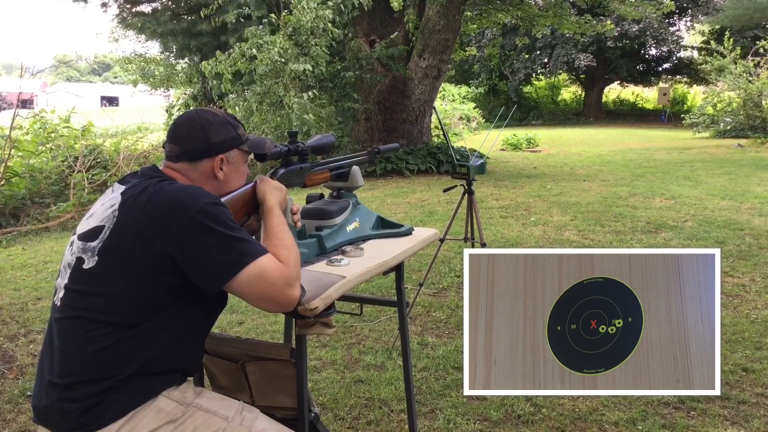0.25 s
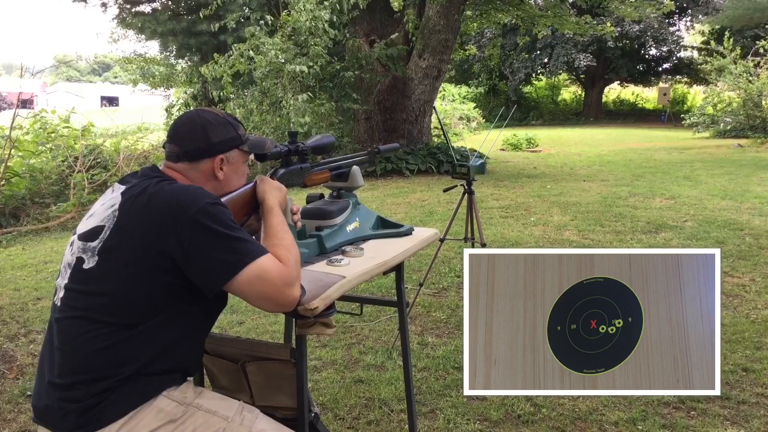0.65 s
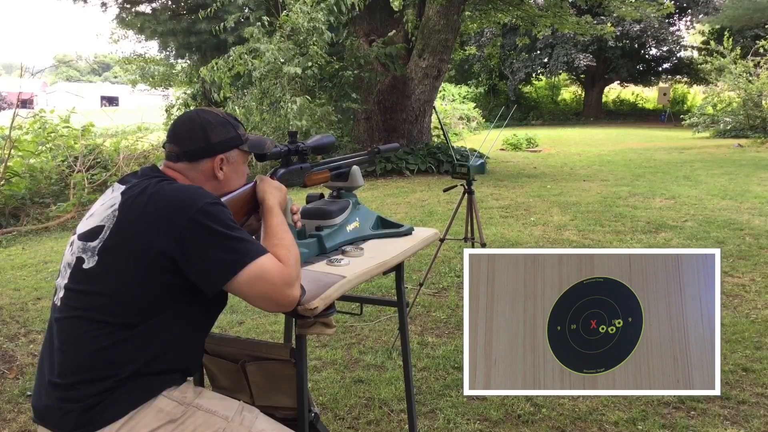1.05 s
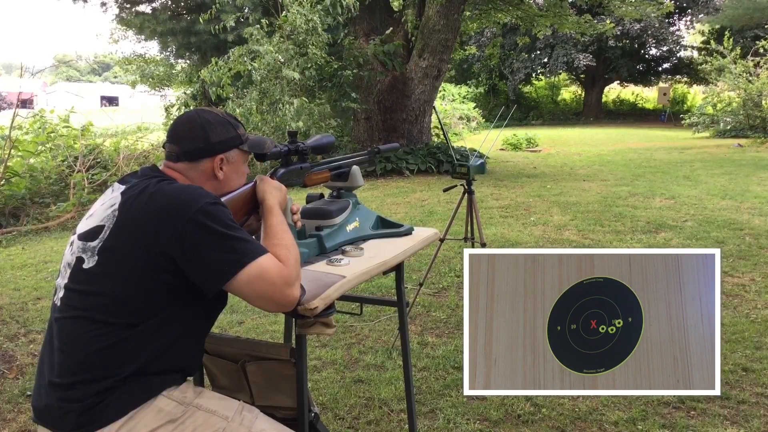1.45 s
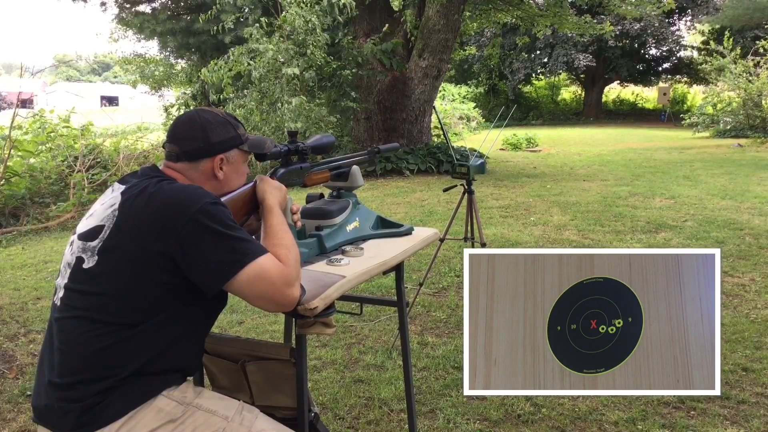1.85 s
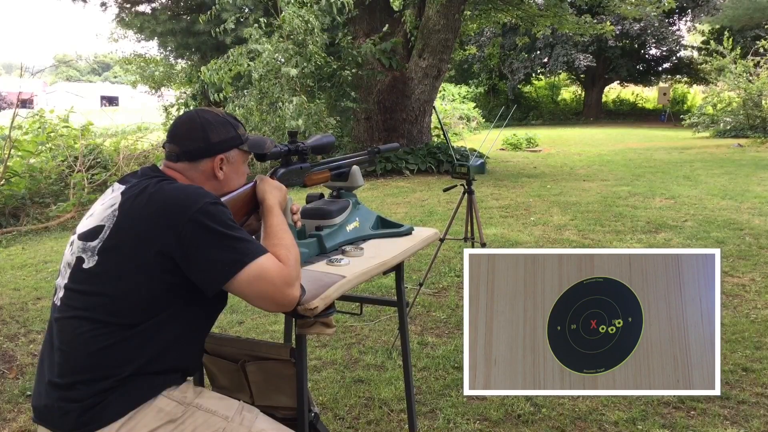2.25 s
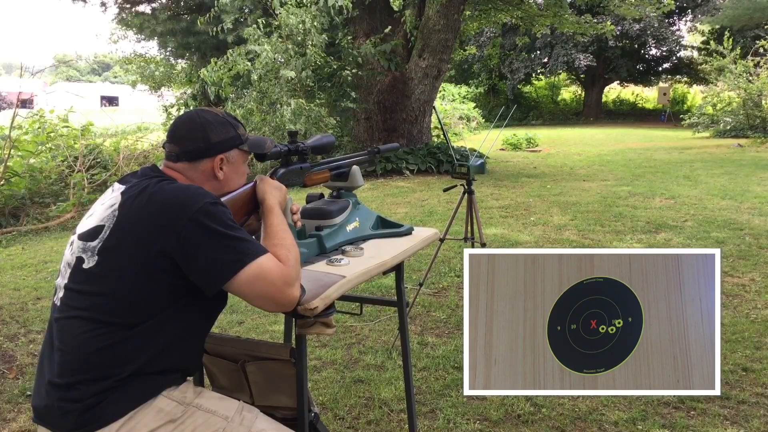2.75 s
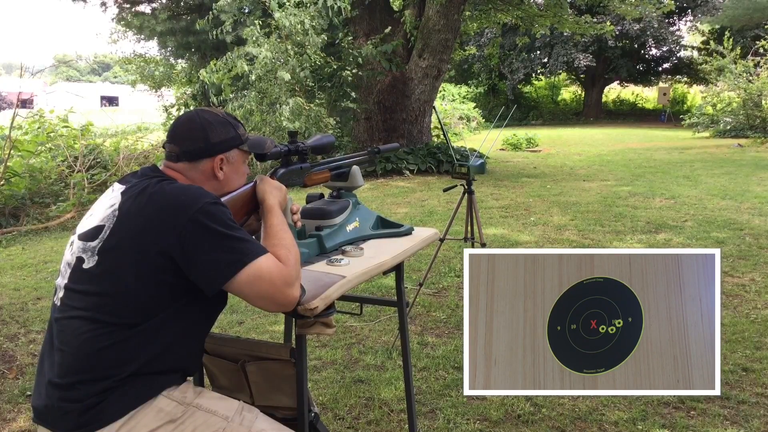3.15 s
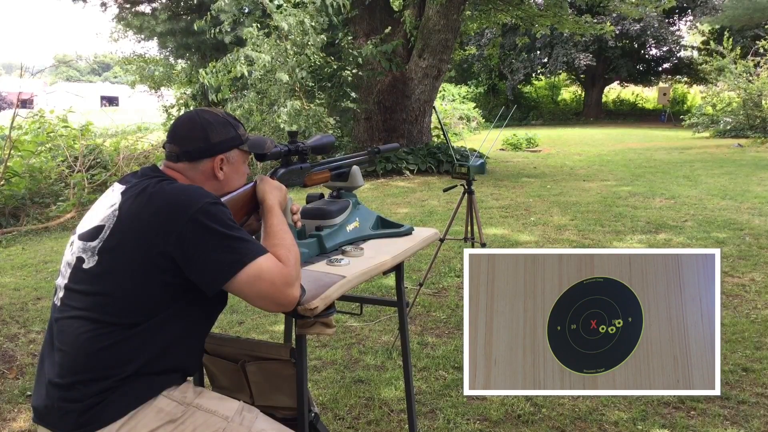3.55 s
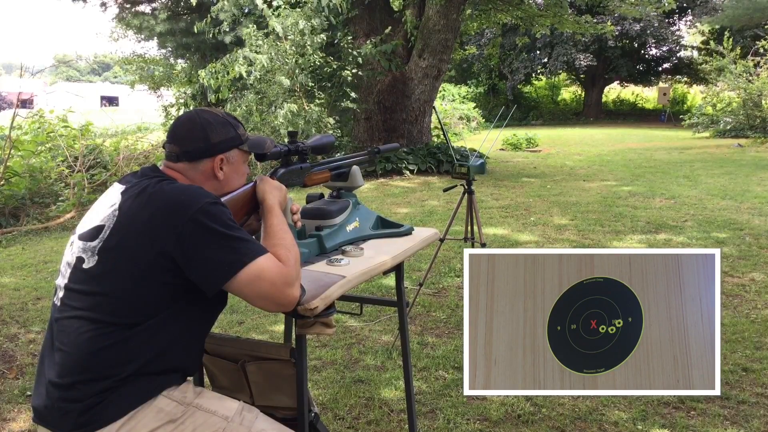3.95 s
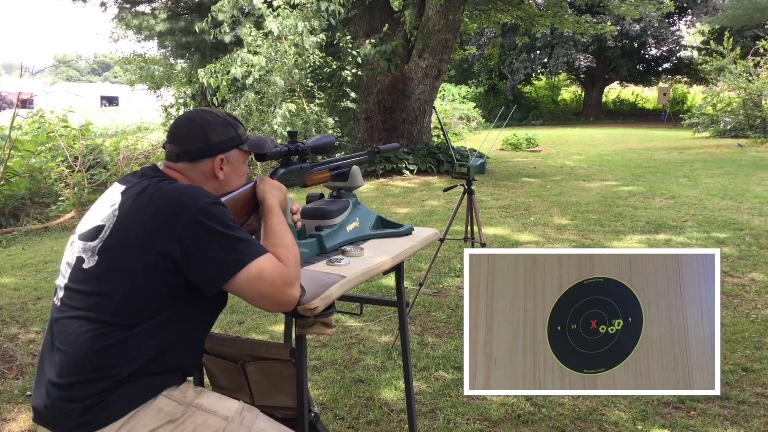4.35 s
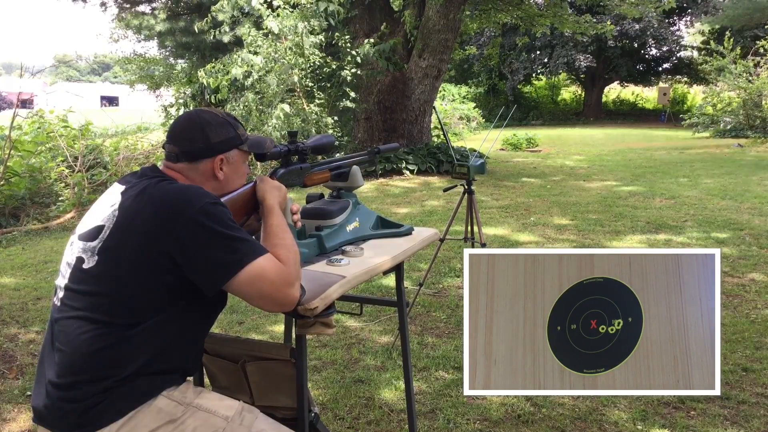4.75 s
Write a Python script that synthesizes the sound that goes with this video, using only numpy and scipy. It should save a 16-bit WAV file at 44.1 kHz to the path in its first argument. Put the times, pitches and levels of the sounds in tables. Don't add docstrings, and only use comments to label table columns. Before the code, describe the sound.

After four and a half quiet seconds of breeze and distant songbirds, an air rifle snaps loudly, its pellet hits a board, and echoes scatter.

```python
import sys
import numpy as np
from scipy import signal
from scipy.fft import rfft, irfft, next_fast_len
from scipy.io import wavfile
from scipy.ndimage import uniform_filter1d

SR = 44100
rng = np.random.default_rng(int(sys.argv[2]) if len(sys.argv) > 2 else 0)


def transcribe(u):
    v = np.clip(np.atleast_2d(u).T, -1, 1)
    q = np.round(v * 32767).astype(np.int16)
    wavfile.write(sys.argv[1], SR, q)


def to_linear_factor(level_db):
    exponent = np.asarray(level_db, float) / 20
    return 10 ** exponent


N = 221247
TIME = np.arange(N) / SR


def on_log(points, hz):
    table_hz, value = np.transpose(points)
    return np.interp(np.log(np.maximum(hz, 1)), np.log(table_hz), value)


def curve(rows, column=1, outside=-120):
    rows = np.array(rows)
    return np.interp(TIME, rows[:, 0], rows[:, column], left=outside)


def noise(points):
    size = next_fast_len(N)
    hz = np.arange(size // 2 + 1) * SR / size
    spectrum = rfft(rng.standard_normal(size)) * to_linear_factor(on_log(points, hz))
    x = irfft(spectrum, size)[:N]
    return x / x.std()


def walk(rate):
    hold = int(SR / rate)
    steps = np.repeat(rng.standard_normal(N // hold + 1), hold)
    x = uniform_filter1d(uniform_filter1d(steps, hold), hold)[:N]
    return x / x.std()


def bands(points, gain_db, flicker_db, rate, calm_hz):
    size = next_fast_len(N)
    hz = np.maximum(np.arange(size // 2 + 1) * SR / size, 1)
    colour = to_linear_factor(on_log(points, hz))
    colour = colour / np.sqrt(np.mean(colour ** 2))
    out = 0
    for centre in 24 * 2 ** (np.arange(20) / 2):
        window = np.cos(np.pi * np.clip(np.log2(hz / centre), -1 / 2, 1 / 2))
        band = irfft(rfft(rng.standard_normal(size)) * colour * window, size)[:N]
        flicker = flicker_db * walk(rate) / (1 + (centre / calm_hz) ** 2)
        out = out + band * to_linear_factor(gain_db(centre) + flicker)
    return out


def ring(start, hz, t60):
    out, i = np.zeros(N), int(start * SR) + 1
    t = TIME[i:] - start
    out[i:] = np.sin(2 * np.pi * hz * t) * to_linear_factor(-60 * t / t60)
    return out


def burst(start, db, t60):
    return to_linear_factor(db - 60 * np.maximum(TIME - start, 0) / t60) * (TIME > start)


# (time [s], level [dB])
JET = [(4.492, -52.5), (4.5095, -28.5), (4.5108, -18), (4.5148, -16.5), (4.5158, -6.5), (4.530, -10),
       (4.534, -17.5), (4.60, -35), (4.68, -97)]
# (frequency [Hz], density [dB per Hz])
JET_COLOUR = [(150, 0.5), (400, -10), (1100, -8), (1900, -9), (3000, -4), (5000, -9.5), (8000, -12),
              (16000, -18)]
VALVE_S = 4.5153
LEAK_TREBLE_DB, BLAST_TREBLE_DB, SETTLED_TREBLE_DB, SETTLE_S = -18, 0, -9.5, .010


def air_jet():
    grain = to_linear_factor(2.1 * walk(1500))
    treble = noise([(5000, -68), (8500, 1), (10500, -5), (12500, 6.5), (14500, -4), (16000, -12.5)])
    fresh = np.exp(-(np.maximum(TIME - VALVE_S, 0) / SETTLE_S) ** 2)
    open_db = SETTLED_TREBLE_DB + (BLAST_TREBLE_DB - SETTLED_TREBLE_DB) * fresh
    share_db = np.where(TIME < VALVE_S, LEAK_TREBLE_DB, open_db)
    return to_linear_factor(curve(JET)) * grain * (noise(JET_COLOUR) + to_linear_factor(share_db) * treble)


# (time [s], frequency [Hz], level [dB])
WHISTLE = [(4.5155, 12600, -24), (4.5178, 11400, -10), (4.5212, 12400, -10), (4.5235, 14200, -13),
           (4.525, 15000, -40)]


def whistle():
    hz = curve(WHISTLE, outside=0) + 250 * walk(3000)
    phase = 2 * np.pi * np.cumsum(hz) / SR
    return to_linear_factor(curve(WHISTLE, column=2)) * np.sin(phase) * (TIME < WHISTLE[-1][0])


# (time [s], level [dB])
BLOWS = [(4.513, -23), (4.5167, -7.5), (4.5195, -16.5), (4.5231, -16.5), (4.527, -8), (4.531, -12)]
# (frequency [Hz], level [dB], t60 [s])
STOCK = [(208, -7, 0.057), (325, -16.5, 0.045), (400, -1.5, 0.04), (521, -1.5, 0.049), (630, -7.5, 0.022),
         (732, -15, .035), (1100, -10, 0.041), (1800, -8.5, .02)]


def stock():
    out = 0
    scatter = 1 + 0.49 * rng.standard_normal((len(BLOWS), len(STOCK)))
    for (s, db), shares in zip(BLOWS, scatter):
        for (hz, mode_db, t60), share in zip(STOCK, shares):
            out = out + to_linear_factor(db + mode_db - 1.5) * share * ring(s, hz, t60)
    return out


# (time [s], level [dB], fade [ms], slowness [ms])
THUDS = [(4.5115, -21, 5, .8), (4.517, -24, 8, .9), (4.530, -8, 14, 1.0), (4.572, 0, 17, 1.0)]


def thuds():
    out = 0
    for s, db, fade_ms, slow_ms in THUDS:
        ms = np.maximum(TIME - s, 0) * 1000
        swell = (1 - np.exp(-ms / 1.5)) * np.exp(-(ms / fade_ms) ** 1.66)
        out = out + to_linear_factor(db) * swell * np.cos(np.pi * np.sqrt(ms / slow_ms))
    return signal.sosfiltfilt(signal.butter(2, 33, "high", fs=SR, output="sos"), out)


# (time [s], level [dB], frequency [Hz], t60 [s])
RINGS = [(4.5108, -13, 3500, .02), (4.5161, -5, 1850, .02), (4.5162, -17, 4400, 0.01),
         (4.5204, -7, 1520, 0.012), (4.5250, -7.5, 1120, .04), (4.5254, -13, 3320, 0.013),
         (4.5262, -11, 1800, 0.0086), (4.5305, -14, 190, .03), (4.5327, -11, 181.6, 0.082),
         (4.5461, -15, 3600, .012), (4.5682, -13, 3600, 0.016), (4.57, -14, 3300, .0074),
         (4.5713, 0.5, 1250, 0.019), (4.572, -7, 1750, 0.021), (4.5712, -12, 4400, .01),
         (4.5749, -12.5, 2464, 0.028), (4.576, -14.5, 3700, 0.031), (4.586, -16, 3850, .02),
         (4.6045, -13.5, 1600, 0.019), (4.6097, -17.5, 3330, 0.047), (4.6218, -22, 1980, .03),
         (4.6593, -11, 1750, 0.011), (4.659, -18, 2700, .012), (4.6886, -20, 2870, .014),
         (4.6902, -21, 2600, 0.016), (4.710, -20, 2400, 0.009), (4.7158, -18, 1550, 0.012),
         (4.7194, -10, 1400, 0.013), (4.7232, -16.5, 1690, 0.014), (4.727, -17, 2300, .014),
         (4.7345, -16.5, 1800, .014), (4.741, -19, 2900, .012), (4.7555, -21, 1800, .014),
         (4.7667, -25, 1490, 0.014), (4.7737, -33, 2970, .012), (4.7934, -27, 3000, 0.011),
         (4.836, -31, 3200, 0.011), (4.93, -43.5, 790, 0.098), (4.946, -29, 2900, .012)]
# (time [s], level [dB], t60 [s])
BURSTS = [(4.565, -21, 0.08), (4.5674, -20, 0.046), (4.5706, -6.5, 0.035), (4.577, -29, 0.069),
          (4.6064, -21, 0.11), (4.6593, -25.5, 0.021), (4.713, -32, 0.04), (4.721, -25.5, 0.03)]
# (frequency [Hz], density [dB per Hz])
SPLINTER = [(300, -10.5), (900, -9), (1500, 0.5), (3500, -5.5), (6000, -12.5), (12000, -15.5), (16000, -21)]


def strikes():
    splinter = noise(SPLINTER) * to_linear_factor(0.66 * walk(830))
    bursts = sum(burst(s, db, t60) for s, db, t60 in BURSTS)
    rings = sum(to_linear_factor(db) * ring(s, hz, t60) for s, db, hz, t60 in RINGS)
    return rings + bursts * splinter


# (time [s], level [dB])
TICKS = [
    (1.605, -68),
    (1.885, -74),
    (3.808, -70),
    (4.5107, -22),
    (4.5713, -9),
    (4.7217, -25),
]


def ticks():
    bright = noise([(3000, -27), (7000, -3), (12000, 4), (16000, -1)])
    return sum(burst(s, db, .006) * bright for s, db in TICKS)


# (time [s], level [dB])
TREES = [(4.53, -39), (4.56, -34), (4.60, -22), (4.64, -26.5), (4.695, -27), (4.722, -24.5), (4.76, -27.5),
         (4.85, -32), (5.02, -41)]
# (frequency [Hz], density [dB per Hz])
TREES_COLOUR = [(60, -10.5), (150, -14.5), (400, -19), (880, -13.5), (1080, -3.5), (1500, -2.5), (2300, 0),
                (3300, -5.5), (4300, -10), (8500, -17.5), (12000, -26), (15500, -41.5)]
# (frequency [Hz], extra fade [dB/s])
AIR_LOSS = [(200, 27), (450, 20.5), (750, 17), (1100, -3.5), (1500, -2), (3000, 11), (6000, 22.5),
            (9000, 42.5), (12500, 68), (17000, 128)]


def trees():
    level_db, late = curve(TREES), np.maximum(TIME - 4.8, -.3)

    def gain_db(hz):
        return level_db - on_log(AIR_LOSS, hz) * late

    return bands(TREES_COLOUR, gain_db, flicker_db=0.64, rate=90, calm_hz=9000)


# (start [ms], length [ms], start pitch [Hz], end pitch [Hz], level [dB])
LEAP = [(0, 18, 4200, 3850, -7), (29, 29, 5050, 5000, -.5), (56, 45, 5040, 5010, -10)]
WARBLE = [(5, 24, 4590, 4610, 0), (50, 22, 4600, 4050, -11), (70, 30, 4050, 3480, -8),
          (118, 16, 5300, 5310, -12), (148, 14, 5500, 5350, -18), (165, 26, 5750, 6200, -11),
          (190, 12, 6200, 6300, -15), (200, 16, 6450, 6500, -11), (220, 45, 6400, 6200, -22)]
HOOK = [(2, 11, 6320, 5600, -12), (11, 27, 5600, 5500, -9), (38, 28, 5500, 5380, -12),
        (52, 22, 3960, 4400, -4), (72, 20, 4420, 3750, -8), (76, 22, 4400, 4250, -14),
        (88, 10, 3750, 3250, -12), (94, 22, 3250, 2600, -8), (110, 40, 4300, 4350, -18),
        (134, 26, 2700, 3250, -11)]
STAIRS = [(3, 32, 7350, 6250, -4), (32, 22, 6350, 6300, -6), (42, 14, 5350, 5750, -5),
          (56, 14, 5750, 5500, -6), (60, 20, 4600, 5300, -3), (80, 16, 3950, 4400, -2),
          (108, 18, 3750, 4200, -3), (122, 26, 2850, 3450, -4)]
ARCH = [(0, 16, 5800, 6900, 0), (16, 18, 7000, 7250, -4), (36, 16, 6700, 5300, -6)]
SLIDE = [(0, 34, 4580, 4400, -2), (32, 26, 4400, 4240, -4), (62, 29, 4260, 4200, -9)]
CHIP = [(0, 16, 4450, 4750, -10), (14, 18, 4880, 4900, 0), (28, 18, 4700, 4000, -12)]
VEE = [(0, 26, 6050, 4880, -2), (10, 20, 5600, 5300, -7), (27, 24, 5500, 5650, -9)]
DROP = [(0, 23, 7250, 6500, -.5)]
# (time [s], syllable, level [dB], pitch [ratio], stretch [ratio])
SONG = [(1.081, LEAP, -75.5, .995, 1.01), (1.341, LEAP, -72, 1.005, .99), (1.47, DROP, -78, .925, 1.5),
        (1.582, WARBLE, -67, 1, 1.02), (1.866, WARBLE, -67, 1.002, .97), (2.153, HOOK, -70.5, 1.002, 1.03),
        (2.374, HOOK, -69.5, .998, .97), (2.68, STAIRS, -75.5, .999, 1.001), (2.995, DROP, -85, .97, 1.1),
        (3.055, ARCH, -82, 1.06, .9), (3.272, SLIDE, -77, .97, .99), (3.335, ARCH, -82, .985, 1.1),
        (3.503, SLIDE, -74, 1.03, 1.01), (3.574, ARCH, -77.5, 1.001, 1.001), (3.765, DROP, -86, .995, 1.1),
        (3.783, CHIP, -70.5, .997, 1.05), (3.836, VEE, -75, 1.005, 1.03), (3.922, DROP, -82, .98, .8),
        (3.939, CHIP, -67.5, 1.002, .92), (3.99, VEE, -75, .992, .97), (4.148, VEE, -78, .955, .9),
        (4.252, CHIP, -74, 1.03, 1.15)]
# (time [s], length [ms], start pitch [Hz], end pitch [Hz], level [dB])
NOTES = [(.035, 53, 1447, 1465, -73), (.71, 25, 1910, 1780, -77), (0.727, 26, 1790, 1680, -73),
         (.73, 50, 2500, 2650, -80), (.78, 60, 2830, 2880, -86), (.953, 37, 5540, 5370, -84),
         (1.21, 22, 4050, 4100, -85), (1.385, 25, 5060, 5050, -80), (1.38, 19, 4270, 4000, -82),
         (.99, 15, 3400, 3590, -80), (1.209, 17, 6250, 6160, -83), (2.534, 29, 1464, 1384, -74),
         (3.045, 12, 4830, 5140, -78), (3.066, 14, 3900, 4500, -77), (3.096, 16, 3700, 4500, -79),
         (2.833, 23, 2870, 2970, -80), (3.075, 19, 4480, 4720, -76.5), (3.058, 14, 6500, 6700, -77),
         (3.068, 27, 7000, 6800, -82), (3.085, 24, 7000, 7600, -81), (3.116, 26, 3440, 3480, -82),
         (3.139, 28.6, 2830, 3400, -77), (3.3, 23, 4130, 4050, -75), (3.4, 34, 2750, 3180, -74),
         (3.432, 19, 3090, 2990, -75), (3.512, 26, 3000, 2980, -79), (3.648, 32, 2960, 3010, -85),
         (4.04, 30, 1514, 1475, -79), (4.105, 23, 4980, 4330, -80), (4.325, 29, 3900, 3220, -82),
         (4.377, 27, 3330, 3600, -84), (4.4, 37, 3750, 4150, -79)]


def birds():
    out, waver = np.zeros(N + SR), 1 + 0.011 * walk(400)
    sung = []
    for s, syllable, db, pitch, stretch in SONG:
        for at, ms, hz0, hz1, note_db in syllable:
            sung.append((s + at * stretch / 1000, ms * stretch, hz0 * pitch, hz1 * pitch, db + note_db))
    for s, ms, hz0, hz1, db in sung + NOTES:
        i, n = int(s * SR), int(1.19 * ms * SR / 1000)
        hz = np.linspace(hz0, hz1, n) * waver[i:i + n]
        tone = np.sin(2 * np.pi * np.cumsum(hz) / SR)
        out[i:i + n] += to_linear_factor(db + 3.5) * np.hanning(n) ** 0.4 * tone
    lag = TIME[:SR // 4]
    decay = to_linear_factor(-36 - 60 * lag / .3) + to_linear_factor(-30 - 60 * lag / .06)
    smear = rng.standard_normal(len(lag)) * decay * (lag > .003)
    echo = signal.fftconvolve(out, smear)[:N]
    return out[:N] * to_linear_factor(3.2 * walk(130)) + echo * to_linear_factor(4.5 * walk(500))


# (middle [s], peak level [dB], length [ms])
PUFFS = [(.145, -48, 47), (.182, -43, 38), (.354, -45.5, 40), (.437, -31, 27.4), (.465, -39.5, 48),
         (.511, -41, 17), (0.533, -35, 41), (.72, -43.5, 78), (.84, -45.5, 60), (.979, -43.5, 22),
         (1.029, -46.5, 60), (1.197, -42.5, 68), (1.283, -42.5, 51), (1.329, -37, 25), (1.488, -46, 23.5),
         (1.552, -43, 65), (1.748, -44, 79), (2.387, -46, 17), (2.579, -42.5, 44), (2.665, -45, 25.5),
         (3.101, -46, 79), (3.23, -42.5, 38.4), (3.319, -43, 58), (3.463, -40.5, 28.6), (4.101, -43, 46),
         (4.233, -42.5, 25.4), (4.318, -44, 34), (4.408, -46, 24.5), (4.457, -43, 44), (4.9, -49, 35),
         (4.985, -44, 9.8), (5.0, -44.5, 22)]
PUFF_LOW_HZ, PUFF_EXTRA_CYCLES = 60.4, 0.91
WIND_DB = -56.5
# (frequency [Hz], density [dB per Hz])
WIND_COLOUR = [(18, -29.5), (30, -17.5), (45, 7.5), (75, -1), (120, 5), (170, -7), (260, -26.5),
               (500, -67.5)]


def wind():
    out = np.zeros(N + SR)
    waver, start = 1 + 0.14 * walk(60), rng.uniform(0, 2 * np.pi, len(PUFFS))
    rush = to_linear_factor(-13.0) * noise([(60, -13), (130, 5.5), (220, 0.0), (320, -32), (600, -69)])
    for (s, db, ms), phase in zip(PUFFS, start):
        hz = PUFF_LOW_HZ + PUFF_EXTRA_CYCLES / ms * 1000
        n = int(1.378 * ms * SR / 1000)
        i = max(int(s * SR) - n // 2, 0)
        swing = np.sin(phase + 2 * np.pi * np.cumsum(hz * waver[i:i + n]) / SR)
        out[i:i + n] += to_linear_factor(db) * np.hanning(n) * (swing + rush[i:i + n])
    level_db = WIND_DB - 1.5 + 2.3 * walk(33) + 2.5 * walk(9)
    return out[:N] + to_linear_factor(level_db) * noise(WIND_COLOUR)


# (time [s], level [dB])
ROAD = [(0, -83), (1.6, -84), (1.75, -69), (2.2, -75), (2.6, -69.5), (3.0, -74.5), (3.35, -69.5),
        (3.8, -72), (4.2, -79), (4.9, -73), (5.02, -54)]
# (frequency [Hz], density [dB per Hz])
ROAD_COLOUR = [(60, -21.5), (250, -16.5), (600, 2.5), (1100, -4.5), (1600, -15), (2500, -22.5), (5000, -72)]


def road():
    return to_linear_factor(curve(ROAD) + 0.97 * walk(12.0)) * noise(ROAD_COLOUR)


YARD_DB = -57
# (frequency [Hz], density [dB per Hz])
YARD = [(30, -29.5), (120, -1.5), (170, -6), (300, -17.5), (410, -14), (470, -26.5), (900, -31),
        (1300, -29), (1700, -35), (3000, -43.5), (7000, -61)]


def yard():
    return bands(YARD, lambda hz: YARD_DB, flicker_db=2.0, rate=7.48, calm_hz=2500)


HISS_DB = -76
# (frequency [Hz], density [dB per Hz])
HISS = [(800, -26), (2000, 3.5), (4500, 1.5), (7000, -3), (7900, -7.5), (8250, -1.5), (9500, -4),
        (12000, -7), (15500, -9)]


def hiss():
    return to_linear_factor(HISS_DB) * noise(HISS)


def scene():
    shot = air_jet() + whistle() + stock() + thuds() + strikes() + ticks() + trees()
    surroundings = birds() + wind() + road() + yard() + hiss()
    return (shot + surroundings)[None]


def low_pass(x):
    return signal.sosfilt(signal.butter(12, 15430, fs=SR, output="sos"), x)


def record(dry):
    full = dry / (1 + np.abs(dry / 1.05) ** 6) ** (1 / 6)
    cut = signal.sosfiltfilt(signal.ellip(6, .1, 40, 15300, fs=SR, output="sos"), full)
    return low_pass(np.clip(cut, -1, 1))


dry = scene()
out = record(dry)
transcribe(out)
```